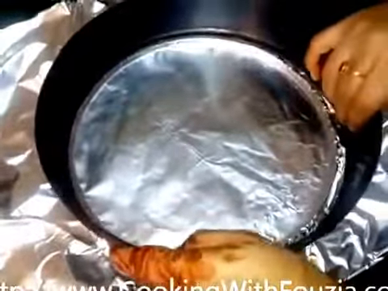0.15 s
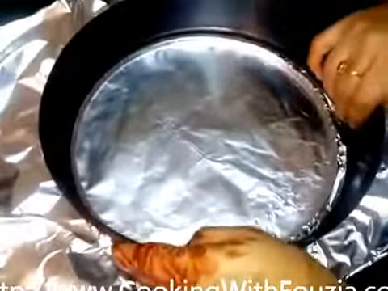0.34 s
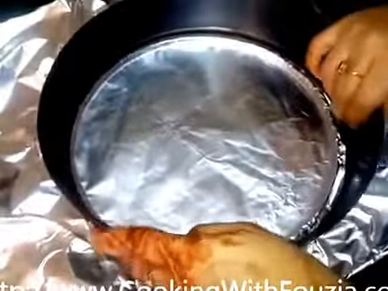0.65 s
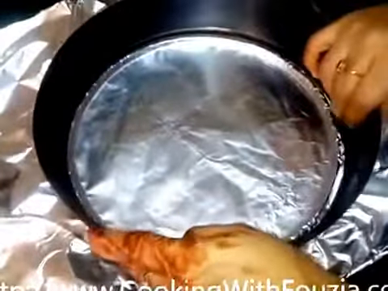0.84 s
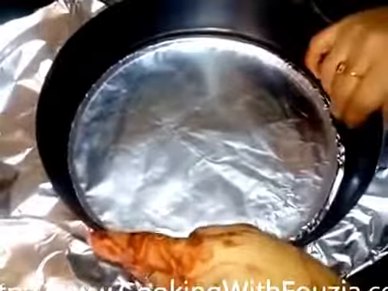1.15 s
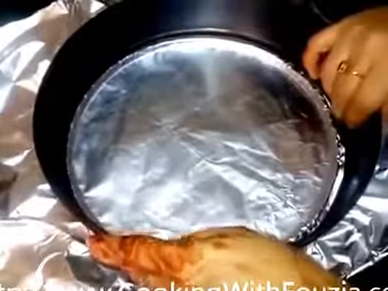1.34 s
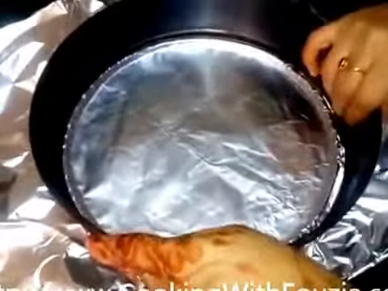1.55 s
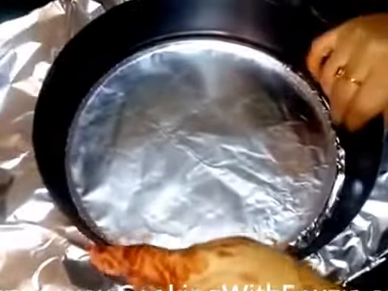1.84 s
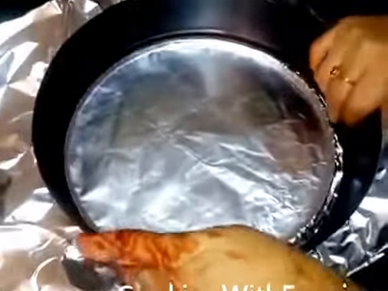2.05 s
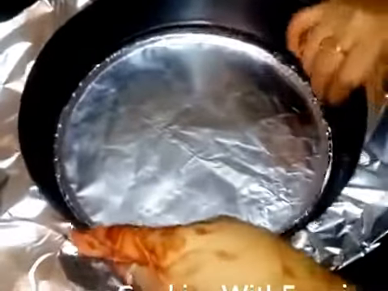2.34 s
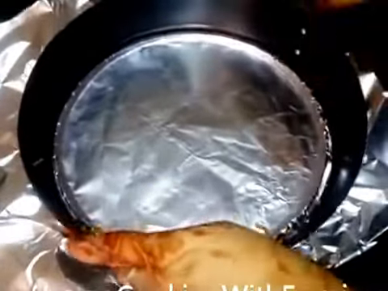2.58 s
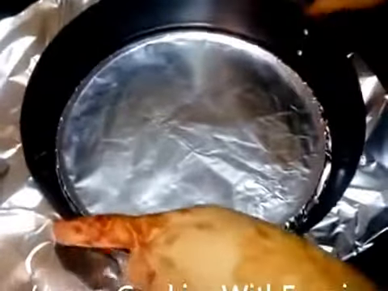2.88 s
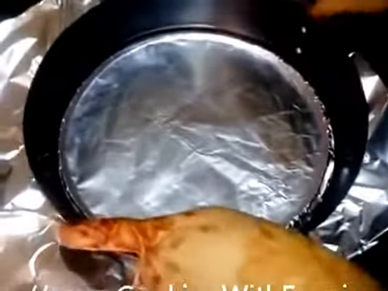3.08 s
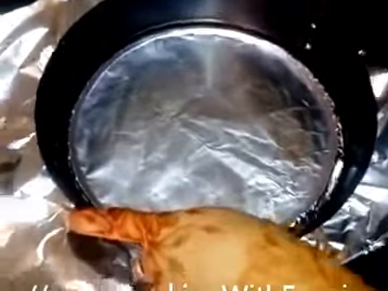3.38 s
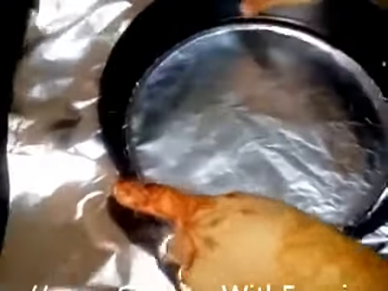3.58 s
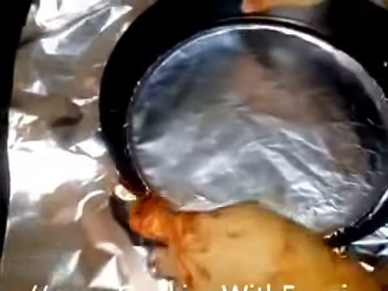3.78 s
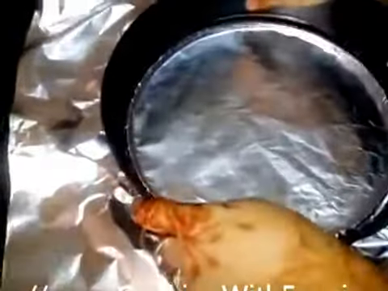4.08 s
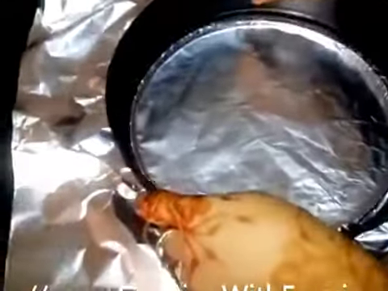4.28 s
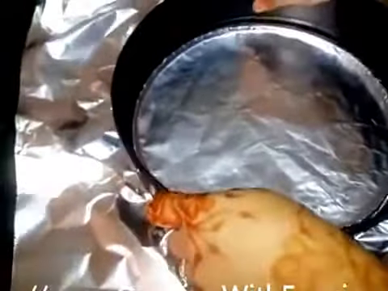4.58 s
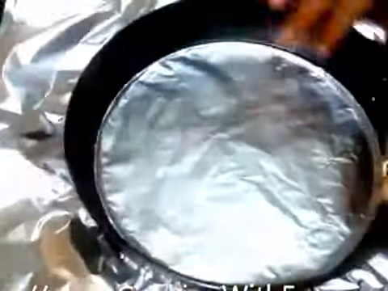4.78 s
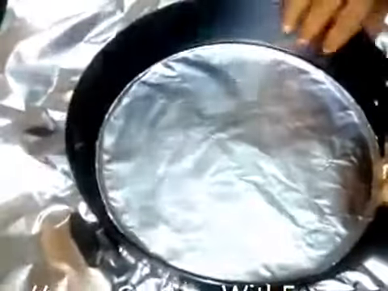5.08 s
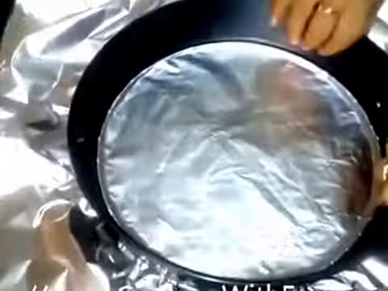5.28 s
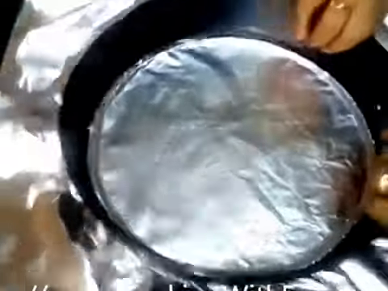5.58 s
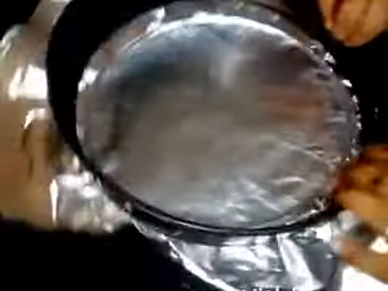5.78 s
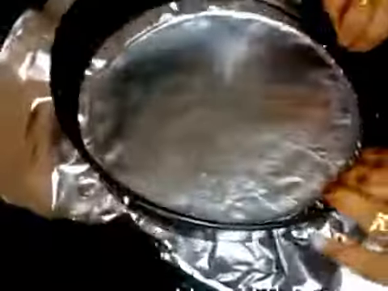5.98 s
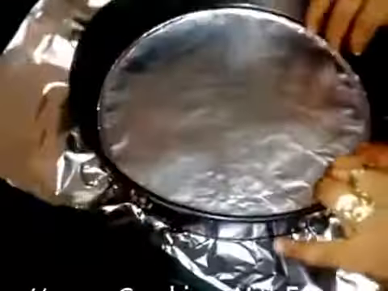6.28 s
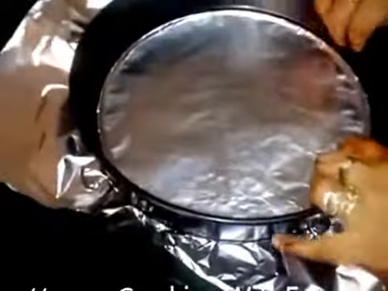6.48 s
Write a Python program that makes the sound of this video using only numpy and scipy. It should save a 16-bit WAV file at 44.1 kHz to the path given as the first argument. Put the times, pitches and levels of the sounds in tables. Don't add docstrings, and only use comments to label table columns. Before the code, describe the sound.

In a quiet kitchen with soft air noise and a low far-off hum, foil ticks and crinkles sparsely. Around two seconds the handling thickens into continuous crackling; later the pan is turned and knocked, with sharp metallic snaps loud enough to clip. The microphone is close, the top end slightly dulled, the echoes short.

```python
import sys
import numpy as np
from scipy import signal
from scipy.fft import rfft, irfft, next_fast_len
from scipy.io import wavfile

SR = 44100
rng = np.random.default_rng(int(sys.argv[2]) if len(sys.argv) > 2 else 0)


def level_to_linear(level):
    exponent = np.asarray(level, float) / 20
    return 10 ** exponent


def store_wav(level_fs):
    pcm = np.round(np.clip(np.atleast_2d(level_fs), -1, 1) * 32767)
    wavfile.write(sys.argv[1], SR, pcm.T.astype(np.int16))


N = 292383

# (time [s], peak level [dB], brightness [dB], ring time [s])
SHARP_SNAPS = [(0.3508, -27.5, 0, .04), (.431, -24, 6, 0.027), (.781, -33, 14, .05),
               (.796, -8, 11.5, 0.032), (.8803, -15, -2, 0.025), (.964, -12.5, -1.5, 0.036),
               (1.0113, -20, 0, .05), (1.207, -33, -.5, .058), (1.3407, -27, 0, 0.077),
               (1.7865, -16.5, 3.5, 0.036), (1.8329, -10.5, -1, 0.047), (2.5405, -5.5, 2.5, 0.12),
               (3.2922, -13.5, 7, 0.051), (3.373, -14.5, 5.5, 0.054), (3.8805, -11, 3.5, 0.053),
               (4.1924, -16.5, 11, .04), (4.635, -19.5, 19, .043), (4.7939, -9.5, 7, 0.031),
               (4.004, -9, 5, .04), (5.156, -20, 15, 0.035), (5.4435, -20.5, -13, 0.016),
               (5.8475, -1.5, 1, 0.052), (5.9879, -3, 3, .04), (6.0954, -8, 1, 0.037), (6.377, -13, 6, .04),
               (6.4738, -11.5, 0, 0.011)]
# (time [s], peak level [dB], brightness [dB], ring time [s],
# pitch of ringing patch [Hz])
PITCHED_SNAPS = [(0.0288, -6, -1, .035, 3530), (0.4402, -7, 1.5, 0.033, 3437), (2.817, -10.5, 3, 0.041, 3200),
                 (3.155, -6, 7.5, .05, 3970), (3.6465, 8.5, 1.5, 0.034, 3400), (5.061, 13, -13, .016, 1250),
                 (5.1763, 9, 7, .035, 4400), (5.5913, .5, 3.5, 0.045, 2430), (6.3885, -1, 5, .035, 3100),
                 (4.9307, -15, -6, .03, 1550), (.4505, -16, -4, .035, 1650)]
# (frequency [Hz], level per Hz [dB])
FOIL_TONE = [(88, -55), (150, -19.5), (253, -31.5), (302, -16), (766, -19), (1570, 0), (2310, -9),
             (2810, -2.5), (3760, -2.5), (4220, -7), (4840, -6), (8330, -17.5), (10900, -31), (14300, -30),
             (15500, -30)]


def at_hz(points, hz):
    curve_hz, values = np.transpose(points)
    return np.interp(np.log(hz + 1), np.log(curve_hz), values)


def rms_one(x):
    return x / np.sqrt(np.mean(x ** 2) + 1e-20)


def coloured(x, db_at):
    size = next_fast_len(len(x))
    hz = np.arange(size // 2 + 1) * SR / size
    return irfft(rfft(x, size) * level_to_linear(db_at(hz)), size)[:len(x)]


def bump(hz, centre_hz, log_width):
    return np.exp(-(np.log((hz + 1) / centre_hz) / log_width) ** 2)


def shares(hz, low_hz=2200, high_hz=6500, steep=5.7):
    body = 1 / (1 + (hz / low_hz) ** steep)
    sheen = 1 / (1 + (high_hz / (hz + 1)) ** steep)
    return body, sheen


def drift(per_s):
    r = np.exp(-64 * np.pi * per_s / SR)
    noise = rng.standard_normal(N // 32 + 2002)
    slow = signal.lfilter([1], [1, -2 * r, r * r], noise)[2000:]
    return np.interp(np.arange(N) / 32, np.arange(len(slow)), rms_one(slow))


def room_air():
    # (frequency [Hz], level per Hz [dB])
    air_tone = [(18, -49), (30, -16.5), (299, 0.5), (443, -1.5), (492, -7), (561, -5.5), (921, -6.5),
                (1590, -3.5), (2240, -10.5), (3680, -9.5), (6540, -24.5), (14300, -25), (15500, -28)]
    air_db = -46 + 1.5
    return level_to_linear(air_db) * rms_one(coloured(rng.standard_normal(N), lambda hz: at_hz(air_tone, hz)))


def far_motor():
    # (multiple of turning rate [count], level [dB rms])
    hum_lines = [(2, -63.5), (4, -67.5), (5, -68), (6, -55.5), (8, -62), (10, -54), (11, -63), (13, -66),
                 (14, -62), (16, -62.5), (20, -61)]
    turning_hz = 49.36
    turn = 2 * np.pi * turning_hz * np.arange(N) / SR
    hum = np.zeros(N)
    for multiple, line_db in hum_lines:
        wavering = np.sqrt(2) * level_to_linear(line_db + 1.87 * drift(11.5))
        hum += wavering * np.sin(int(multiple) * turn + rng.uniform(0, 4.87))
    return hum


def thuds():
    # (time [s], peak level [dB], pitch [Hz])
    pan_knocks = [(.024, -29, 810), (3.647, -21, 310), (3.647, -14.5, 740), (5.059, 2.5, 1230),
                  (5.059, -22, 360), (5.176, -30, 281.9), (5.176, -8.5, 830), (5.179, -5, 4830),
                  (5.06, -45, 45.02), (5.176, -46, 45), (5.592, -30, 820), (6.139, -19, 339.9),
                  (6.215, -27.5, 305)]
    out, t = np.zeros(N + SR), np.arange(SR // 5) / SR
    for s, peak_db, pitch_hz in pan_knocks:
        band = signal.butter(2, [pitch_hz / 1.4, pitch_hz * 1.4], "band", fs=SR, output="sos")
        knock = signal.sosfilt(band, rng.standard_normal(len(t)) * level_to_linear(-60 * t / .08))
        at = round(s * SR)
        out[at:at + len(t)] += level_to_linear(peak_db + 3.5) * knock / np.abs(knock).max()
    return out[:N]


def stirring():
    # (start [s], hardest moment [s], end [s], level [dB], brightness [dB])
    hand_squeezes = [(0.195, 0.403, 0.42, -34, -1), (.9, 1.0, 1.15, -33.5, -3.5),
                     (1.792, 1.84, 2.08, -25.5, -4.5), (2.04, 2.22, 2.466, -29, -3),
                     (2.303, 2.48, 2.604, -21.5, -5), (2.5, 2.57, 2.738, -17, 2),
                     (2.685, 2.73, 2.776, -23.5, -7.5), (2.86, 3.02, 3.164, -21, 0),
                     (3.2, 3.29, 3.29, -32, -3), (3.345, 3.595, 3.69, -16, 1),
                     (3.597, 3.735, 3.995, -14, 8), (3.974, 4.017, 4.1186, -19.5, 4.5),
                     (4.063, 4.16, 4.38, -27, -3), (4.35, 4.45, 4.55, -24, -1.5),
                     (4.52, 4.606, 4.7, -33.5, -2), (4.622, 4.76, 4.81, -21, 1),
                     (4.82, 4.97, 5.05, -23, -5), (5.06, 5.097, 5.2, -21.5, -12.5),
                     (5.56, 5.65, 5.72, -16, 3), (5.6, 5.72, 5.9, -14, 0), (5.77, 5.86, 6.04, -13, -1),
                     (6.1, 6.183, 6.3, -8, 3), (6.2, 6.301, 6.43, -16, 6)]
    swing_db, let_go_db = 13.5, 37
    settle_s = .005
    after_db, after_rings = -15.5, 3
    t = np.arange(0, N + 32, 32) / SR

    start, hardest, end, squeeze_db, bright_db = np.transpose(hand_squeezes)[:, :, None]
    away = np.maximum((hardest - t) / (hardest - start), (t - hardest) / (end - hardest))
    squeezes = squeeze_db - swing_db * away - let_go_db * np.maximum(away - 1, 0)

    sharp = [row[:4] for row in SHARP_SNAPS + PITCHED_SNAPS]
    s, peak_db, snap_bright_db, ring_s = np.transpose(sharp)[:, :, None]
    since = t - s - settle_s
    swarms = np.where(since > 0, peak_db + after_db - 60 * since / (after_rings * ring_s), -200)

    power = level_to_linear(2 * np.maximum(np.vstack([squeezes, swarms]), -200))
    total = power.sum(axis=0)
    brightness = np.sum(power * np.vstack([bright_db, 0.27 * snap_bright_db]), axis=0) / total
    return [np.interp(np.arange(N) / SR, t, curve) for curve in (10 * np.log10(total), brightness)]


def crinkle():
    level_db, bright_db = stirring()
    born = rng.random(N) < 3500 * level_to_linear(4.0 * drift(25)) / SR
    sizes = born * level_to_linear(0.55 * np.minimum(rng.exponential(size=N), 3.5)) * rng.choice([-1, 1], size=N)
    sizes = sizes * level_to_linear(5.2 * (rng.random(N) < .025))
    pitches = np.geomspace(250, 15000, num=24)
    dealt = rng.integers(24, size=N)
    out = np.zeros(N)
    for k, hz in enumerate(pitches):
        r, w = level_to_linear(-60 * hz / (9.0 * SR)), 2 * np.pi * hz / SR
        struck = sizes * (np.abs(dealt - k) < 2) + 1e-18
        rings = signal.lfilter([1, 0, -1], [1, -2 * r * np.cos(w), r * r], struck)
        body, sheen = shares(hz)
        tone_db = at_hz(FOIL_TONE, hz) + (sheen - body) * bright_db + 2.23 * drift(11)
        out = out + (-1) ** k * np.sqrt(hz) * rms_one(rings) * level_to_linear(tone_db)
    whole = np.sqrt(np.sum(pitches * level_to_linear(2 * at_hz(FOIL_TONE, pitches))))
    return level_to_linear(level_db - 1.5) * out / whole


def crease_colour(hz, bright_db, patch_hz, patch_db, facets):
    body, sheen = shares(hz)
    patch = patch_db * bump(hz, patch_hz, 0.071) + at_hz(facets, hz)
    return at_hz(FOIL_TONE, hz) + body * (3.5 - bright_db) + sheen * (5 + bright_db) + patch


def snaps(table, rise_s, crack, count):
    out, t = np.zeros((count + 1, N + SR)), np.arange(SR // 8) / SR
    click = np.arange(len(t)) == SR // 300
    for k, (s, peak_db, bright_db, ring_s, *own_hz) in enumerate(table):
        if own_hz:
            patch_hz = own_hz[0]
        else:
            patch_hz = 3400 * 2 ** (.008 * bright_db + 0.12 * rng.standard_normal())
        cracks = rng.standard_normal(len(t)) * level_to_linear(1.85 * rng.exponential(size=len(t)))
        facets = np.c_[np.geomspace(500, 15000, num=12), 3.0 * rng.standard_normal(12)]

        def colour(hz, patch_db):
            return crease_colour(hz, bright_db, patch_hz, patch_db, facets)

        dying = level_to_linear(-60 * t / max(ring_s, .005)) + crack * level_to_linear(-60 * t / 0.0049)
        shape = np.minimum(t / rise_s, 1) * dying
        direct = level_to_linear(peak_db - 4.5) * shape * rms_one(coloured(cracks, lambda hz: colour(hz, 6.5)))
        to_walls = np.std(direct) * rms_one(coloured(click, lambda hz: colour(hz, 2.0)))
        at = round(s * SR)
        out[0, at:at + len(t)] += direct
        out[1 + k % count, at:at + len(t)] += to_walls
    return out[:, :N]


def foil_folds():
    # (time [s], peak level [dB], brightness [dB], ring time [s])
    early_folds = [(.0034, -10, -2, 0.05), (.0154, -14, 3, 0.037), (.239, -27.5, 5, .065),
                   (.661, -30.5, 5, 0.11), (.737, -27, -3, 0.086), (.9192, -22.5, -3.5, .052),
                   (1.516, -30.5, -3, 0.078), (1.684, -25.5, 3, 0.047), (1.8187, -16, -2, .038),
                   (1.8692, -14, 3, 0.094), (1.8903, -10.5, 3.5, 0.066), (1.961, -26, -3, .044),
                   (1.9808, -16.5, 5.5, 0.087), (1.9944, -17, 12, 0.059), (2.1433, -20, -7, 0.062),
                   (2.1877, -17.5, -2, 0.081), (2.2885, -18, -0.5, 0.096), (2.3137, -11.5, 2, 0.059),
                   (2.39, -19, 3, .089), (2.4594, -11.5, 2.5, 0.096), (2.4806, -8.5, 1, 0.072),
                   (2.5126, -11.5, -2, .075), (2.7317, -11, 4.5, 0.063), (2.8958, -10.5, 2, 0.12),
                   (2.9693, -12.5, 11, .091), (2.984, -9.5, 9, 0.073), (3.1132, -14.5, 8, 0.076),
                   (3.264, -11.5, -1, .051)]
    # (time [s], peak level [dB], brightness [dB], ring time [s])
    late_folds = [(3.4052, -13, 2.5, 0.13), (3.5244, -8, 2, 0.074), (3.5802, -4, 6, 0.075),
                  (3.76, 0, 9.5, 0.061), (4.0145, -8, 5, 0.062), (4.109, -8, 2.5, .054),
                  (4.404, -23.5, -15, 0.072), (4.4469, -11, 11, 0.068), (4.5166, -13.5, 0.5, .06),
                  (4.556, -16, -7, .047), (4.7047, -14, 5, 0.051), (4.7346, -3.5, 5, 0.072),
                  (4.8574, -16.5, -2, .054), (4.8755, -15, 3, 0.067), (4.9514, -6, 5.5, 0.045),
                  (4.979, -10.5, -2.5, 0.089), (5.107, -17, -17, .054), (5.1307, -8.5, -6.5, .12),
                  (5.526, -20, 0, 0.099), (5.5488, -18, 4, 0.1), (5.626, -10, -3, .05),
                  (5.6596, -8, 2.5, .1), (5.8208, -3, 0.5, .072), (5.8789, -3, 6, .063),
                  (6.114, -2.5, 3, 0.067), (6.1379, 2, -2, 0.088), (6.21, 4.5, 9, 0.057),
                  (6.353, -9, 1, .064)]
    sharp = snaps(SHARP_SNAPS + PITCHED_SNAPS, rise_s=0.00072, crack=0.27, count=4)
    broad = snaps(early_folds + late_folds, rise_s=0.007, crack=0.14, count=4)
    return sharp + broad


def kitchen(places):
    # (frequency [Hz], time to fall by 60 dB [s])
    echo_times = [(200, 0.33), (1500, 0.4), (5000, 0.25), (14000, 0.11)]
    change_s = 4.823
    t, tails = np.arange(SR // 2) / SR, 0
    white = rng.standard_normal((len(places), len(t)))
    borders = np.geomspace(90, .45 * SR, num=22)
    for low, high in zip(borders, borders[1:]):
        band = signal.butter(1, [low, high], "band", fs=SR, output="sos")
        tails = tails + signal.sosfilt(band, white) * level_to_linear(-60 * t / at_hz(echo_times, low))
    tails = tails * np.clip((t - .003) / 0.0016, 0, 1)
    tails = tails / np.sqrt(np.sum(tails ** 2, axis=1, keepdims=True))
    echoes = []
    for part in np.split(places, [round(change_s * SR)], axis=1):
        echoed = signal.fftconvolve(part, tails, axes=1).sum(axis=0)
        echoes.append(echoed[:part.shape[1]])
    return np.hstack(echoes)


def pan_hollow(x):
    return coloured(x, lambda hz: 2 * bump(hz, 1627, 0.077))


def scene():
    background = room_air() + far_motor()
    knocks, rustle, folds = thuds(), crinkle(), foil_folds()
    echoes = kitchen(np.vstack([folds[1:], rustle + level_to_linear(-5) * knocks]))
    foil = folds[0] + rustle + knocks + level_to_linear(-4) * echoes
    return (pan_hollow(foil) + background)[None]


def low_pass(x):
    return signal.sosfilt(signal.butter(12, 15810, fs=SR, output="sos"), x)


def record(dry):
    overloaded = np.clip(dry, -.98, .98)
    top_cut = signal.cheby2(24, 45, 15250, fs=SR, output="sos")
    mix = np.clip(signal.sosfilt(top_cut, overloaded), -1, 1)
    return low_pass(mix)


dry = scene()
out = record(dry)
store_wav(out)
```